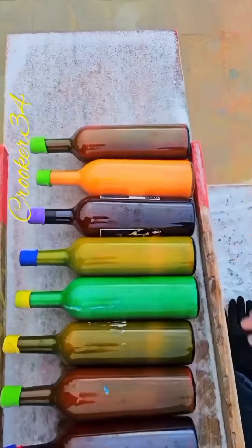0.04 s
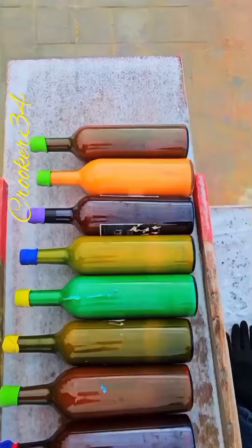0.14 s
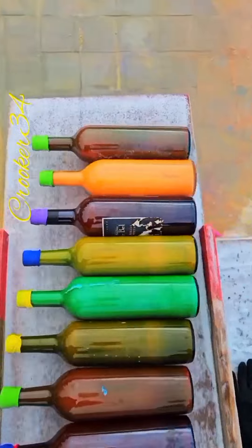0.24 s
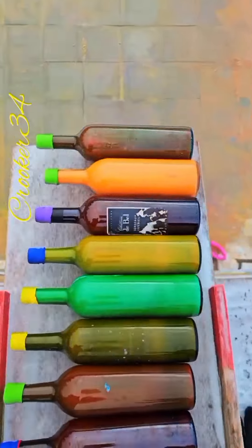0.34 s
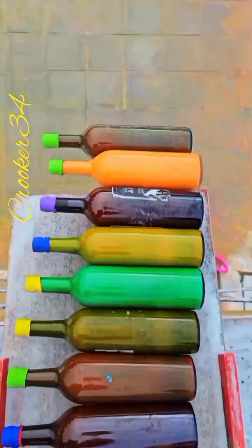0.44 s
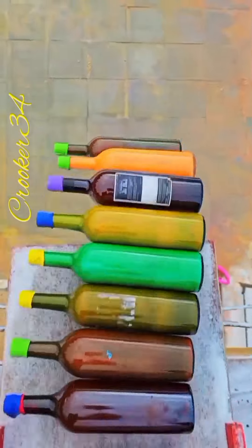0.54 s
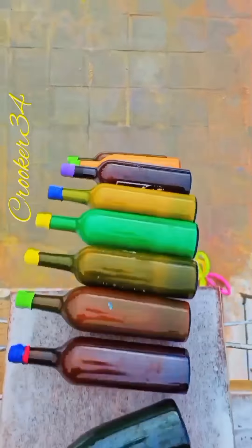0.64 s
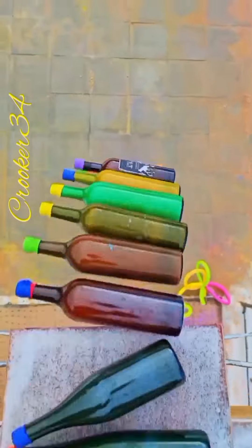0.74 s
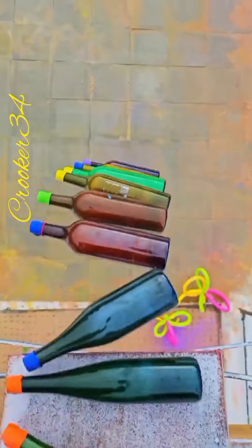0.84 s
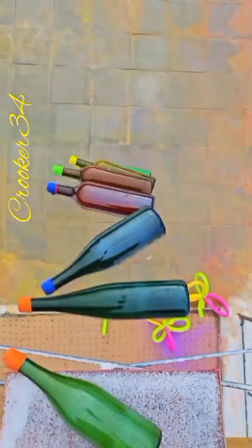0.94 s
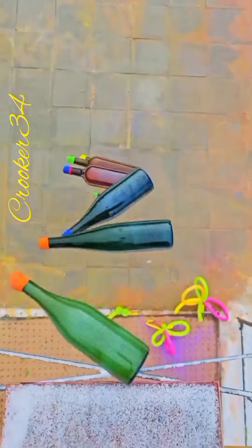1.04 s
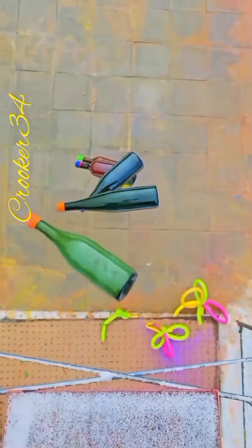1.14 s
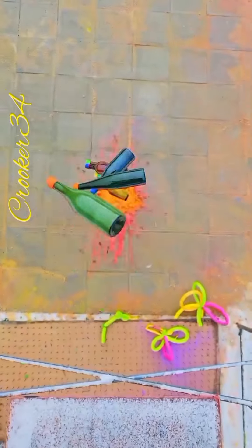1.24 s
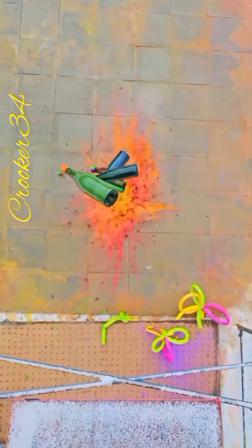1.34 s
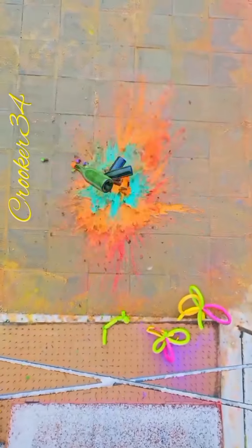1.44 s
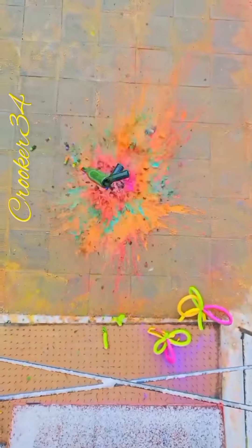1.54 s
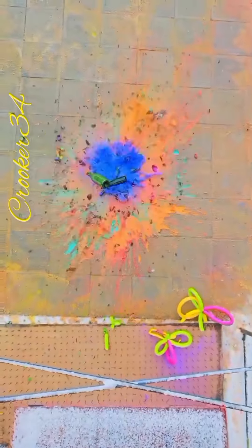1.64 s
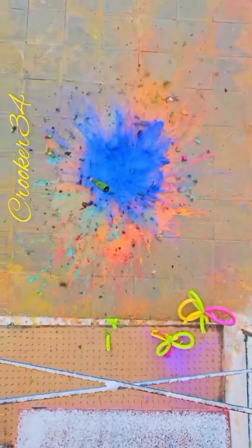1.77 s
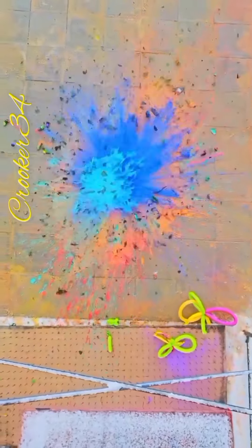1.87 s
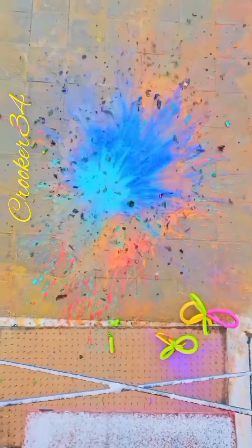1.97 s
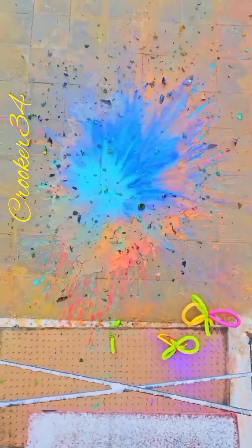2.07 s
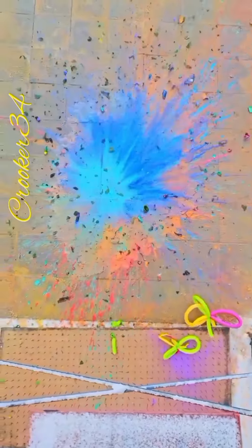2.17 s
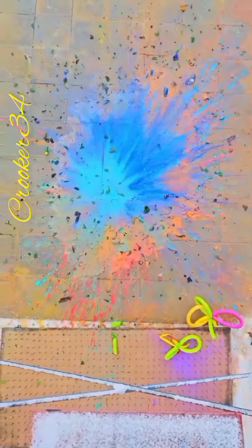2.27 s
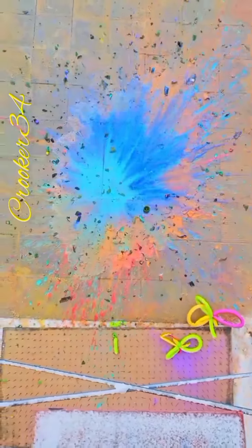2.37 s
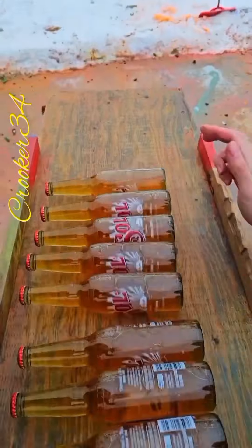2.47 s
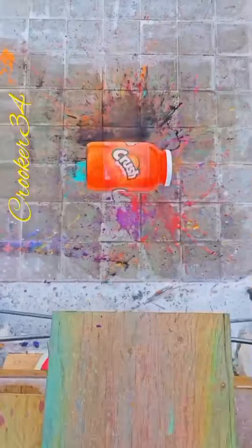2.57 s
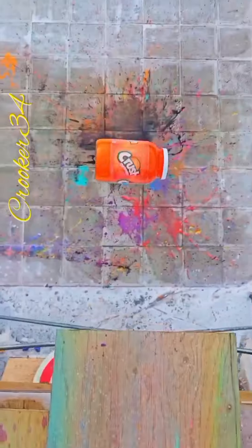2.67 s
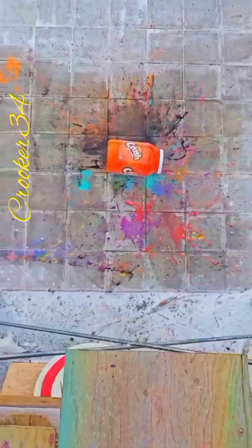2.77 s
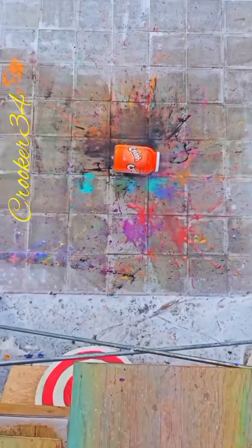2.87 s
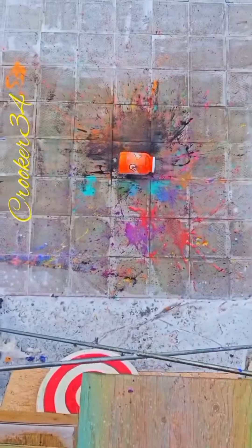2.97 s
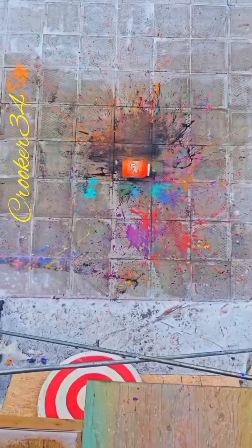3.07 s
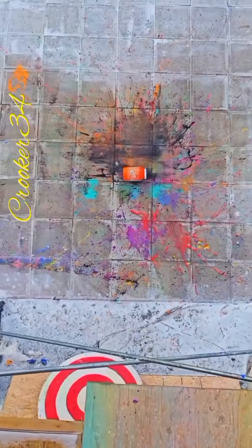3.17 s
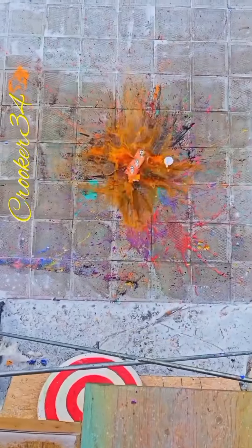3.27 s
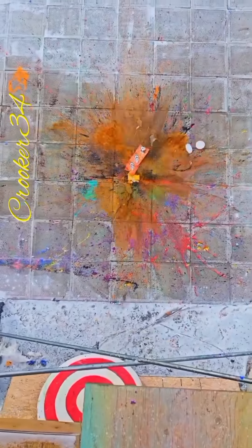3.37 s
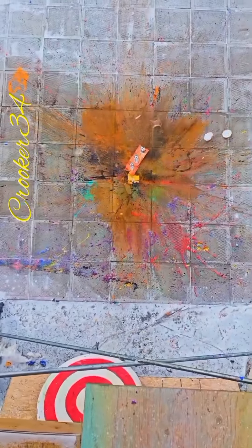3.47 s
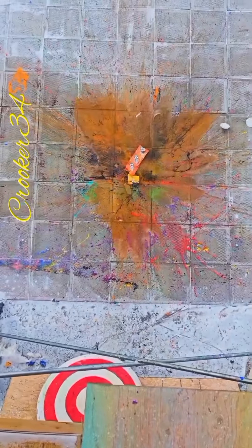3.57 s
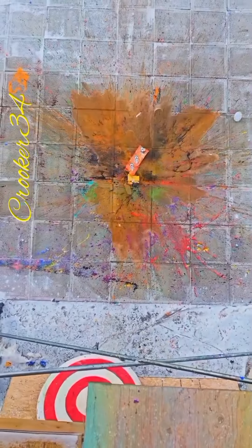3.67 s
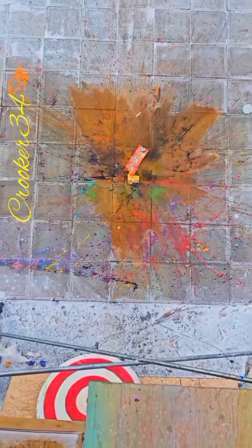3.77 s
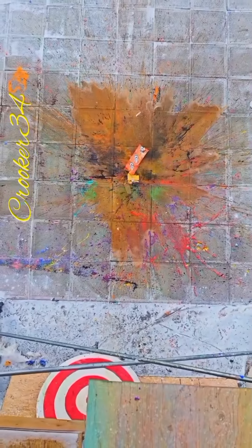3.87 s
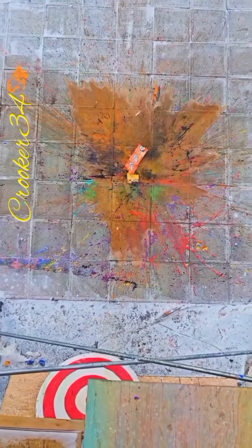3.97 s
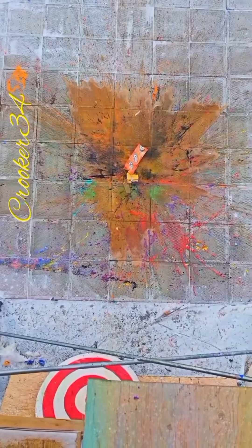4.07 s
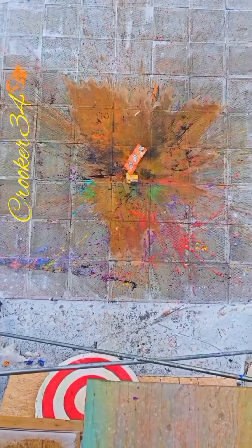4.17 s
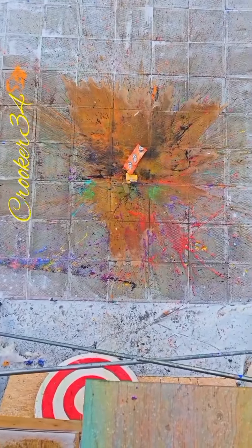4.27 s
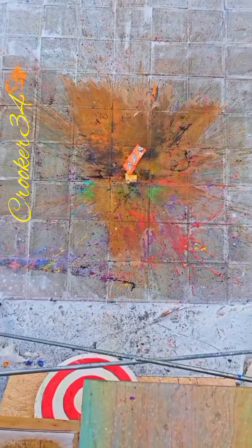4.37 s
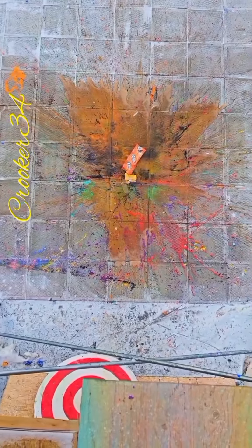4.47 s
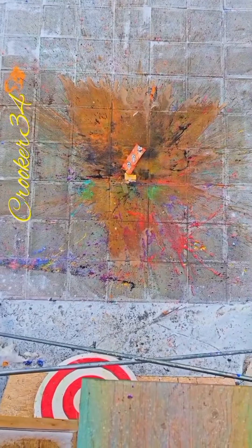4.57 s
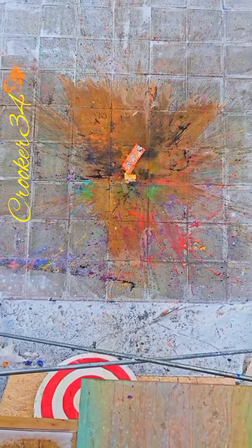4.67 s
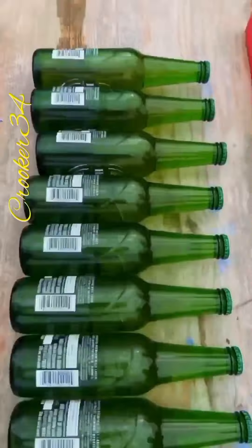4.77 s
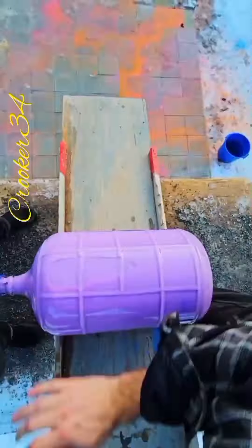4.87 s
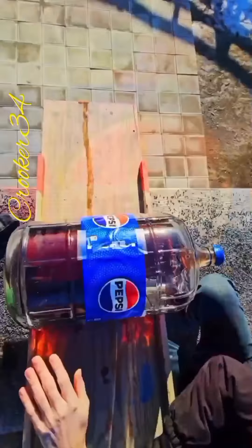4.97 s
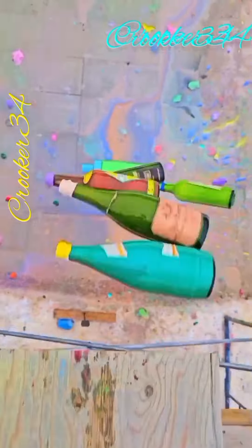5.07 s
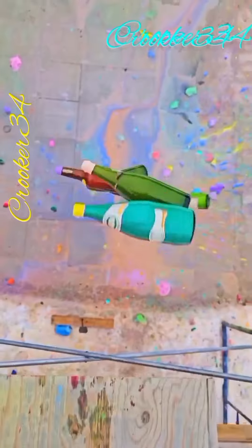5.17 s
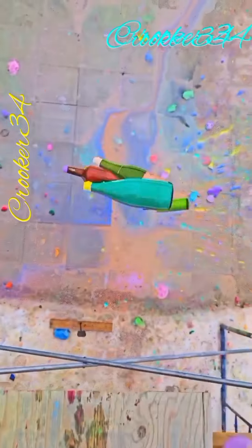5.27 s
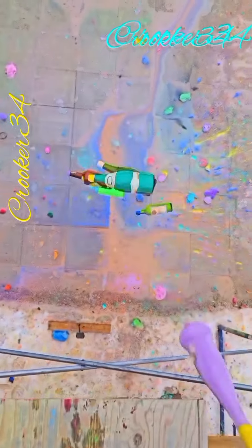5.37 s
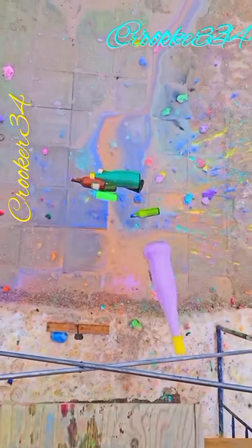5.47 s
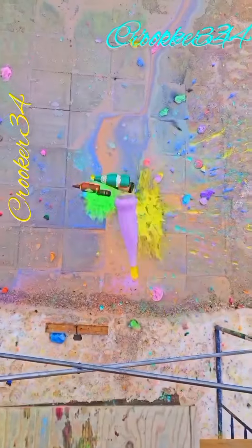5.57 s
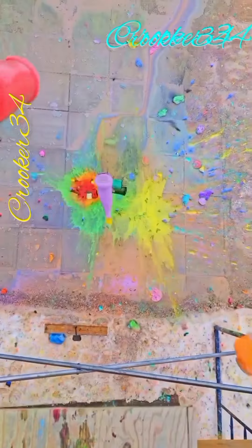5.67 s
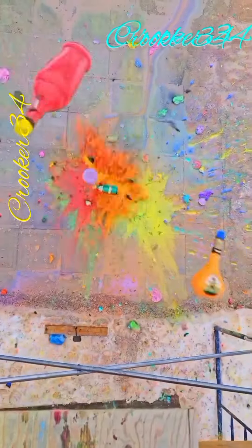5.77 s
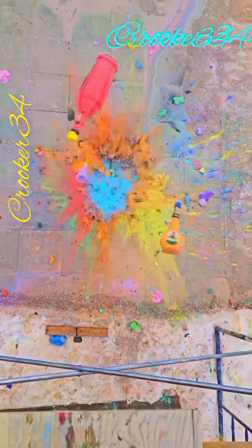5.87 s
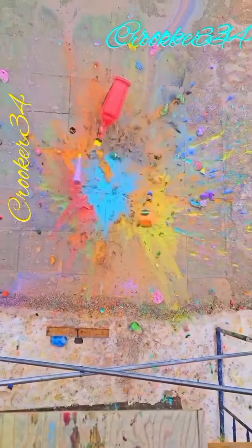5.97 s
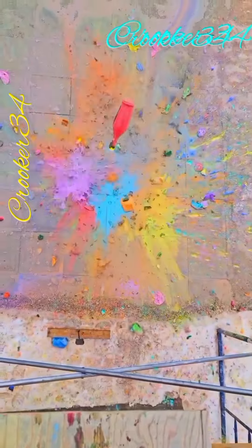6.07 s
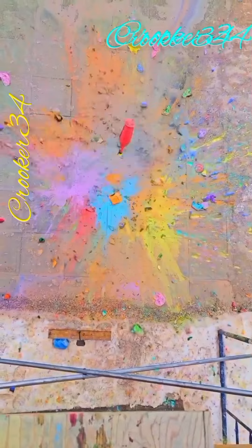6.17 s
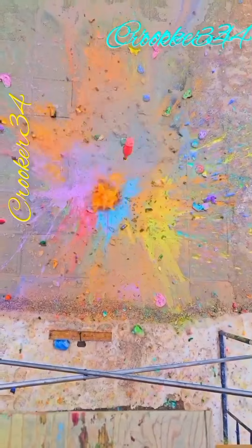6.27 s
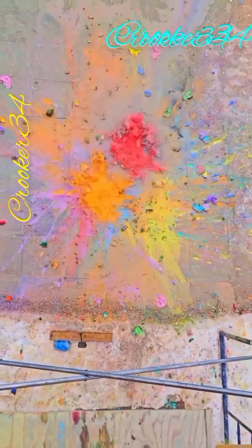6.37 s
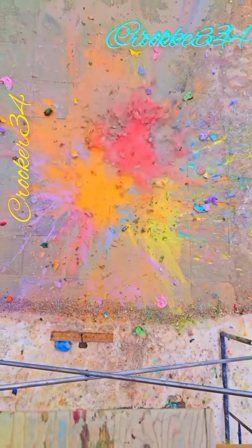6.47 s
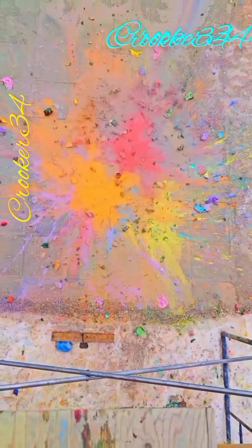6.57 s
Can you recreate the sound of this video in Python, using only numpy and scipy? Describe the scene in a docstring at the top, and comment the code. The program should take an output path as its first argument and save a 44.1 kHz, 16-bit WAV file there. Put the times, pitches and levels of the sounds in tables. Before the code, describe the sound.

A light breeze and distant town surround a close wooden plank. From 0 to 0.3 s bottles rumble heavily, hollow at first then deeper, with glassy chatter; the rumble drops and thins until 1.1 s, with clinks at 0.4-0.6 and dull knocks. From 1.18 to 1.82 about a dozen bottles smash rapidly on stone below: falling pops, dense bright splinters, short ringing walls. Shards skitter and tinkle until 2.4, then stop abruptly. A snatch of rolling comes at 2.43-2.52; the breeze drops and a faint steady hum runs until 4.63. At 3.21 a splashy double break is followed by smaller cracks to 3.6, wet slaps, tinkles and a heavy base bouncing, fading by 4.2. A brief clinking roll at 4.64-4.73 gives way to very faint rolling and knocks near 4.95. From 5.48 to 6.27 a third splashy chain of smashes bursts, shards scattering to the end, with short yard reverberation.

```python
"""Rows of filled glass bottles rumble down a wooden plank, drop and smash on a paved yard in three crashes.
Bumps coloured by the plank make the rumble; tiny contacts and short rings make the rolling glass chatter.
Each break is a falling pop, a crackle of splinters and splash, and ringing walls; shards skitter and tinkle
away, and in the second crash a heavy bottle base bounces. Two later rolls are short snatches, the last is faint.
Shaped noise gives a breeze, which drops, and a distant town; a machine hums for a while as a steady tone."""
import sys
import numpy as np
from scipy import signal
from scipy.fft import rfft, irfft, next_fast_len
from scipy.io import wavfile
from scipy.ndimage import map_coordinates

SR = 44100
rng = np.random.default_rng(int(sys.argv[2]) if len(sys.argv) > 2 else 0)


def bounce(signal):
    """Save signal as a 16-bit WAV file at the path given by the first command-line argument."""
    frames = np.transpose(np.atleast_2d(signal))
    limited = np.clip(frames, -1, 1)
    pcm = np.round(limited * 32767).astype(np.int16)
    wavfile.write(sys.argv[1], SR, pcm)


N = 291494  # samples in the scene
EAR_LAG = 0.00019  # s, sound crossing from one microphone to the other
TOP_HZ = 15550  # upper band limit

# bottles and large pieces breaking on the paving; one bottle may take two rows.
# The functions add their own trims to the pop, large-piece and splash levels:
# [start_s, cracking_s before the glass gives way, pop_db, pop_hz, splinters_db, large_pieces_db,
#  splash_db, burst_t60_s, thrown_shards_db]
BREAKS = [(1.179, 0.00093, -16, 3500, -19, -20.5, -77, 0.06, -35),
          (1.229, 0.0043, -31, 2530, -11.5, -20, -69, 0.059, -30),
          (1.287, 0.0066, -3.5, 1860, -16.5, -17, -68, 0.026, -43),
          (1.338, .001, -10, 3000, -16, -22, -36, 0.17, -39),
          (1.391, 0.006, -10, 3700, -18.5, -17.5, -50, 0.053, -29),
          (1.440, 0.0012, -16, 1540, -18.5, -17.5, -28, 0.13, -26.5),
          (1.488, 0.0018, -31, 1990, -18, -22, -63, 0.18, -43),
          (1.508, .002, -12.5, 1440, -24, -27.5, -49, 0.61, -44),
          (1.619, 0.0037, -34, 1420, -18.5, -20.5, -61, 0.092, -27.5),
          (1.677, 0.0019, -25, 1520, -18, -24, -67, 0.17, -30),
          (1.764, 0.01, -7.5, 1500, -29, -20.5, -41, 0.074, -28.5),
          (1.812, 0.0013, -7.5, 2800, -15, -24, -37, .038, -46),
          (1.823, 0.0038, -14, 1670, -17.5, -23, -58, 0.17, -32.5),
          (3.212, .002, -10, 2230, -17.5, -25.5, -28.5, 0.41, -25.5),
          (3.220, 0.00081, -15, 1270, -22.5, -26.5, -18.5, 0.069, -40.5),
          (3.447, 0.00087, -17.5, 1970, -19.5, -28, -64, 0.057, -29),
          (3.508, 0.00083, -33, 1800, -18.5, -27, -64, .08, -45.5),
          (3.593, 0.00071, -10, 1900, -30, -28.5, -71, 0.072, -36.5),
          (5.480, 0.0012, -8.5, 3190, -18, -18.5, -21.5, 0.035, -25.5),
          (5.520, 0.00098, -11, 1240, -18, -29, -26, 0.16, -26.5),
          (5.562, 0.00096, -8.5, 966, -22, -21.5, -39, 0.14, -27.5),
          (5.624, 0.0036, -17, 1600, -11.5, -22.5, -25.5, 0.085, -29),
          (5.656, 0.039, -10, 1180, -21, -27, -27, 0.11, -42),
          (5.742, .012, -15, 1480, -14, -21, -30, 0.084, -30.5),
          (5.978, 0.00078, -8, 1440, -21.5, -27, -35, 0.16, -29.5),
          (6.1, 0.0006, -19, 2000, -18, -25.5, -57, 0.056, -30.5),
          (6.204, 0.00206, -12, 490, -17.5, -16, -18, 0.047, -27.5),
          (6.252, 0.0029, -19.5, 566, -15.5, -29, -23, 0.11, -37),
          (6.273, .001, -21, 643, -20.5, -26, -36, 0.36, -40)]
# single pieces landing: [start_s, ring_db before the trim in tinkles, ring_hz, chips_db]
TINKLES = [(1.885, -22.5, 4890, -38), (1.979, -23, 11230, -38), (2.028, -37, 4000, -53),
           (2.114, -22.5, 11500, -41), (2.197, -19, 5210, -29), (2.198, -24.5, 3570, -39),
           (2.249, -29.5, 4250, -33), (2.325, -41, 3700, -29), (3.271, -20.5, 2298, -18),
           (3.328, -19, 3830, -23), (3.339, -26.5, 1082, -45), (3.395, -29, 2420, -45.5),
           (3.449, -17, 5100, -37), (3.452, -31, 1080, -36), (3.510, -18.5, 4770, -42),
           (3.535, -24, 4040, -34), (3.547, -15.5, 11800, -18), (3.594, -18.5, 5180, -52),
           (3.598, -23, 4300, -46), (3.641, -21, 7740, -40.5), (3.66, -27, 4900, -24),
           (3.723, -27, 4440, -37.5), (3.781, -35, 4820, -26), (3.837, -31, 3740, -27.5),
           (3.927, -25.5, 4900, -35), (4, -45, 7190, -39.5), (4.197, -66, 4370, -50.5),
           (4.264, -60, 4490, -49.5), (4.348, -57, 3780, -50), (5.664, -10.5, 4030, -32),
           (5.897, -32, 4130, -40), (6.14, -19, 7730, -45), (6.304, -21, 5000, -37)]
# spectrum of large glass pieces, relative: [freq_hz, level_db per Hz]
LARGE_SPECTRUM = [(150, -19), (500, -5.5), (1000, 0), (1600, 5.5), (2800, 3.5), (3600, 4.5), (5000, -31),
                  (9000, -59)]
# spectrum of fine splinters, relative: [freq_hz, level_db per Hz]
FINE_SPECTRUM = [(1500, -54), (2800, -16.5), (4000, 5.5), (6000, 1), (9000, 1.5), (12000, -0.5),
                 (15000, 0.5)]
# broad hiss, in the air and in the faint last roll, relative: [freq_hz, level_db per Hz]
HISS_SPECTRUM = [(300, -6), (2000, -5), (6000, -9.5), (15000, -15.5)]


def amp(db):
    """Decibels to gain."""
    return 10 ** (np.asarray(db) / 20)


def unit(x):
    """Scaled to rms 1."""
    return x / np.sqrt(np.mean(x ** 2) + 1e-20)


def along(points, hz):
    """(Hz, value) points read on a log frequency axis."""
    f, v = np.transpose(points)
    return np.interp(np.log(hz + 1), np.log(f), v)


def clock(seconds):
    """Sample times from zero."""
    return np.arange(int(seconds * SR)) / SR


def add(out, s, x):
    """Mix x into out from time s."""
    i = max(0, round(s * SR))
    out[:, i:i + x.shape[-1]] += x[..., :N - i]


def gate(start, end, release_t60=0.012):
    """On from start to end, with a 2 ms fade-in, then dying away."""
    t = np.arange(N) / SR
    fade_in = np.clip((t - start) / .002, 0, 1)
    return fade_in * amp(-60 * np.maximum(t - end, 0) / release_t60)


def swell(rise, t60, seconds=1.0):
    """A straight rise, then an even decay in dB."""
    t = clock(seconds)
    return np.minimum(t / max(rise, 1e-4), 1) * amp(-60 * np.maximum(t - rise, 0) / t60)


def colour(x, spectrum):
    """x shaped by (Hz, dB) points, at rms 1."""
    n = x.shape[-1]
    m = next_fast_len(n + 4096)
    gain = amp(along(spectrum, np.fft.rfftfreq(m, 1 / SR)))
    return unit(irfft(rfft(x, m) * gain, m)[..., :n])


def diffuse(pair, bass_alike=0.86):
    """Sound from all sides at two close microphones: alike in the bass, unrelated in the treble."""
    n = pair.shape[-1]
    m = next_fast_len(n)
    likeness = min(bass_alike, 1) * np.sinc(2 * EAR_LAG * np.fft.rfftfreq(m, 1 / SR))
    turn = np.arccos(likeness) / 2
    mid, side = irfft(rfft(pair, m) * [np.cos(turn), np.sin(turn)], m)[:, :n]
    return np.array([mid + side, mid - side])


def ticks(n, rate, spread_db):
    """A diffuse stream of tiny random contacts of uneven size, rate per second."""
    size = amp(spread_db * np.minimum(rng.standard_normal((2, n)), 2)) * rng.choice([-1, 1], (2, n))
    return diffuse(size * (rng.random((2, n)) < rate / SR))


def glass_t60(hz):
    """Glass lying on something rings briefly, and the higher the shorter."""
    return .15 * (4000 / hz) ** .4


def ring(modes, tick_db, rattle=0.56, split=0.0031, twin_db=-7):
    """Struck glass: a tick, then (Hz, dB, t60) modes beating with close twins, jolted again as the piece rattles."""
    t = clock(.3)
    ears = np.array([[1], [-1]])
    out = amp(tick_db - 60 * t / 0.0015) * rng.standard_normal((2, len(t)))
    for hz, db, t60 in modes:
        lag = rng.uniform(-0.62, 0.59) * EAR_LAG * ears
        phase = 2 * np.pi * hz * (t + lag)
        twin = np.sin(phase * (1 + split * rng.normal()) + rng.uniform(0, 2 * np.pi))
        pair = np.sin(phase) + amp(twin_db) * twin
        fade = amp(db + rng.normal(0, 1.5, (2, 1)) - 60 * t / t60)
        out += (hz < TOP_HZ) * fade * pair  # modes above the band limit are left out
    after = rng.uniform(.003, .06, 5)  # s, five later jolts
    jolts = rattle * np.exp(-after / 0.051) * rng.choice([-1, 1], len(after))
    contacts = np.bincount((after * SR).astype(int), jolts)
    contacts[0] = 1
    rattled = signal.fftconvolve(out, contacts[None], axes=1)
    return rattled * np.linalg.norm(out) / np.linalg.norm(rattled)  # the jolts share the energy of the blow


def shards(rate, pitch_hz, t60, spread_db):
    """Many small pieces, each ringing briefly at its own pitch from its own direction."""
    t = clock(.5 * t60)
    traits = np.clip(rng.standard_normal((int(rate * N / SR), 4)), -2, 2)
    pitch, size, life, pan = traits.T[:, :, None]
    start, side = rng.random((len(pitch), 2)).T[:, :, None]
    hz = np.minimum(pitch_hz * 2 ** (.75 * pitch), SR / 2.2)
    fade = amp(spread_db * size - 60 * t / (t60 * 2 ** (life / 2)))
    fade = fade * (1 - (t / t[-1]) ** 2)  # reaches silence at the end of each ring
    where = ((start * N).astype(int) + np.arange(len(t))).ravel()

    def ear(k):
        tone = np.sin(2 * np.pi * hz * (t + k * (side - .5) * EAR_LAG))
        return np.bincount(where, (amp(2 * k * pan) * fade * tone).ravel())[:N]

    return unit(np.array([ear(1), ear(-1)]))


def rolling(chatter_power=1.39, ringing=0.49):
    """Seams and grit bump the plank and the bottles chatter; both fade as bottles run off the end ever faster."""
    # stretches of rolling: [start_s, end_s, rumble_db, chatter_db before the shove, share gone by the end 0-1]
    rolls = [(0, 0.322, -10.5, -31.5, 0.2), (0.32, 1.101, -28, -30.5, .97),
             (2.43, 2.517, -15.5, -25.5, 0.18), (4.643, 4.734, -14, -31, 0.03),
             (4.736, 5.487, -49.5, -64, 0.38)]
    # the plank's voice, one relative spectrum per stretch: [freq_hz, level_db per Hz]
    planks = [
        [(18, -46.5), (30, -2), (85, -8.5), (120, 1.5), (179, -8), (220, 5.5), (369, -9.5), (399, -1),
         (433, -12), (492, -2.5), (607, -15), (785, -9), (1140, -29.5), (1400, -22.5), (1820, -60),
         (3080, -120)],
        [(24, -37), (40, -17), (113, 6), (231, 4), (351, -7), (466, -1.5), (665, -8.5), (844, -21), (1100, -22),
         (1400, -33), (1820, -75), (3080, -120)],
        [(35, -46), (60, -16.5), (100, -11.5), (247, 1.5), (365, -5.5), (457, 0.5), (559, -5.5), (718, -28.5),
         (814, -16.5), (899, -32.5), (1200, -30.5), (1560, -58), (2640, -120)],
        [(35, -44), (60, -35), (124, -2.5), (197, -8.5), (302, 1.5), (499, -8), (566, -18), (641, -17),
         (877, -25), (958, -45), (1200, -28), (1560, -54), (2640, -120)],
        [(30, -20), (100, 2.5), (220, 1), (400, -13), (1300, -29.5), (3000, -32.5)],
    ]
    # hollow, bass-light voice that opens the first rumble: [freq_hz, gain_db]
    hollow = [(150, -23), (400, -3.5), (550, 0), (800, 3), (1100, 3.5), (2000, -5)]
    # rolling wine bottles, relative: [freq_hz, level_db per Hz]
    wine_glass = [(530, -23), (900, -10.5), (1130, -20), (1410, -16), (1850, -18.5), (3380, -15),
                  (4920, -18), (14500, -26), (15400, -41), (16000, -57)]
    # rolling soda bottles, relative: [freq_hz, level_db per Hz]
    soda_glass = [(900, -17), (1400, -8), (1900, -22), (2270, 2.5), (2520, -12), (2740, -4.5), (3200, -24),
                  (3520, -10.5), (4200, -20.5), (8000, -19.5), (15000, -28)]
    # rolling beer bottles, relative: [freq_hz, level_db per Hz]
    beer_glass = [(530, -30.5), (900, -5), (2250, -11), (2830, -20), (4800, -22), (6890, -12), (14700, -37),
                  (16000, -32)]
    deepen_s, hollow_db = .13, -3.5  # the first rumble starts hollow and deepens
    shove_db, shove_t60 = 5.5, 0.64  # an opening shove jostles the glass; t60 in s

    glasses = [wine_glass, wine_glass, soda_glass, beer_glass, HISS_SPECTRUM]
    t, out = np.arange(N) / SR, np.zeros((2, N))
    bumps = ticks(N, rate=900, spread_db=2)
    rings = shards(rate=1100, pitch_hz=2400, t60=.025, spread_db=3)
    grit = unit(ticks(N, rate=2000, spread_db=3)) + ringing * rings
    deep = np.clip(t / deepen_s, .2, 1)
    shove = 1 + amp(shove_db - 60 * t / shove_t60)
    lowpass = signal.butter(2, 350, fs=SR, output="sos")
    for (start, end, rumble_db, chatter_db, gone), plank, glass in zip(rolls, planks, glasses):
        left = 1 - min(gone, 1) * np.clip((t - start) / (end - start), 0, 1) ** 2
        wood = colour(bumps, plank)
        bass = signal.sosfilt(lowpass, wood)
        if start < deepen_s:
            hollow_wood = colour(wood - bass, hollow)
            wood = wood * deep + amp(hollow_db) * np.sqrt(1 - deep ** 2) * hollow_wood
        rumble = amp(rumble_db) * left * wood
        chatter = amp(chatter_db) * shove * left ** chatter_power * colour(grit, glass)
        out += gate(start, end) * (rumble + chatter + clinks(start, end))
    return out


def air(gust_db=3, hum_hz=359, hum_db=-66):
    """A breeze buffets the microphones and carries a distant town, then drops; for a while a machine hums."""
    # distant town, relative: [freq_hz, level_db per Hz]
    town_spectrum = [(30, -19.5), (70, -1), (110, -3.5), (220, -8), (330, -12.5), (700, -22.5), (1300, -37),
                     (3000, -55.5)]
    # wind on the microphones, relative: [freq_hz, level_db per Hz]
    wind_spectrum = [(20, -3.5), (45, -4.5), (80, -2), (115, -4.5), (180, -25), (400, -29.5), (1500, -66)]
    lull_s, lull_takes_s = 2.515, 0.34  # when the breeze drops, and over how long
    wind_db, town_db, hiss_db = (-39.5, -70), (-43, -57.5), (-63.5, -73)  # (in the breeze, in the calm)

    t = np.arange(N) / SR
    calm = np.clip((t - lull_s) / lull_takes_s, 0, 1)
    wind, town, hiss = (amp(np.interp(calm, [0, 1], levels)) for levels in (wind_db, town_db, hiss_db))

    def noise(spectrum):
        return colour(diffuse(rng.standard_normal((2, N)), bass_alike=0.89), spectrum)

    # smooth random swells, one point every 3000 samples
    drift = map_coordinates(rng.standard_normal(N // 3000 + 4), [np.arange(N) / 3000])
    gusts = unit(amp(gust_db * drift))
    running = gate(2.52, 4.63)
    hum = amp(hum_db) * running * np.sqrt(2) * np.sin(2 * np.pi * hum_hz * t)
    return wind * gusts * noise(wind_spectrum) + town * noise(town_spectrum) + hiss * noise(HISS_SPECTRUM) + hum


def clinks(start, end, level_db=2, grind_t60=.07, tick_db=-14):
    """Full bottles knock and briefly grind against each other during one roll; their filling damps the ring."""
    # bottles knocking together: [start_s, ring_db before level_db, grinding_db, one_bottle_hz, other_bottle_hz]
    knocking = [(0.409, -28.5, -30, 2174, 3400), (0.501, -22, -16.5, 3000, 4960),
                (0.527, -24, -19.5, 1710, 3920), (0.62, -13.5, -31, 2196, 2960),
                (4.645, -31, -30, 2250, 2820), (4.685, -21.5, -35.5, 1866, 2870),
                (4.694, -15.5, -32.5, 1950, 2868), (4.711, -28, -30.5, 1935, 2740)]
    # partials of one bottle: [frequency_ratio, level_db]
    bottle = [(1, 0.5), (1.829, -4.5), (2.45, -28), (3.399, -11)]
    # grinding glass, relative: [freq_hz, level_db per Hz]
    grind_spectrum = [(500, -18.5), (1000, 6.5), (2000, 0), (5000, -3.5), (9000, -10), (15000, -14.5)]
    filled_damping = 0.31  # ring time of a full bottle over that of loose glass

    out, contact = np.zeros((2, N)), swell(.001, grind_t60)
    for s, db, grind_db, hz, other_hz in knocking:
        if start < s < end:
            partials = [(hz * ratio, level) for ratio, level in bottle] + [(other_hz, 1)]
            modes = [(f, level, filled_damping * glass_t60(f)) for f, level in partials]
            add(out, s, amp(db + level_db) * ring(modes, tick_db))
            grinding = colour(ticks(len(contact), rate=5400, spread_db=2.5), grind_spectrum)
            add(out, s, amp(grind_db) * contact * grinding)
    return out


def knocks(level_db=1, t60=0.11):
    """Dull thuds of the plank: wood-coloured contacts under sharp, dying blows."""
    # dull wooden knocks during and after the rolling: [start_s, level_db before level_db is added]
    thuds = [(0.557, -31), (.742, -23), (2.79, -39.5), (4.917, -33), (4.95, -24.5)]
    wood = [(50, 3), (130, -5.0), (225, -2), (350, -14.5), (600, -22.5), (2000, -38), (12000, -49)]  # (Hz, dB per Hz)
    blows, t = np.zeros((1, N)), clock(.5)
    for s, db in thuds:
        add(blows, s, amp(db + level_db - 60 * t / t60) * (1 - np.exp(-t / 0.00022)))
    return blows * colour(ticks(N, rate=9000, spread_db=3), wood)


def bursts(splash_life=0.98):
    """Cracks race through the glass in a dense crackle; landing pieces chip; filling splashes and slaps back."""
    # thrown filling slapping back onto the stone: [start_s, level_db]
    splats = [(3.552, -44), (3.625, -36.5), (3.829, -38), (3.866, -37.5), (6.03, -38)]
    # splashing filling, relative: [freq_hz, level_db per Hz]
    splash_spectrum = [(40, -28), (110, -5), (250, 6), (500, 1), (800, -3.5), (1600, -19.5), (5000, -53)]
    chip_rise_s, chip_t60, chip_large_db = 0.0011, 0.12, -15  # a chipping piece's crackle, and its coarse part
    splat_rise_s, splat_t60 = .004, 0.16  # each slap swells and drains away

    swells = np.zeros((3, N))  # splinters, large pieces, splash
    for s, cracking, _, _, fine_db, large_db, splash_db, t60, _ in BREAKS:
        burst = swell(cracking, t60)
        splash = amp(splash_db) * swell(cracking, splash_life * t60)
        add(swells, s, np.array([amp(fine_db) * burst, amp(large_db) * burst, splash]))
    for s, _, _, chips_db in TINKLES:
        add(swells[:2], s, amp([[chips_db], [chips_db + chip_large_db]]) * swell(chip_rise_s, chip_t60))
    for s, db in splats:
        add(swells[2:], s, amp(db) * swell(splat_rise_s, splat_t60))
    crackle = ticks(N, rate=13000, spread_db=2.5)
    spectra = [FINE_SPECTRUM, LARGE_SPECTRUM, splash_spectrum]
    return sum(level * colour(crackle, spectrum) for level, spectrum in zip(swells, spectra))


def scatter():
    """Every break throws shards that skitter, ringing and scraping as they die down; a crash's throws pile up."""
    # shards of each crash: [start_s, end_s, stop_t60_s, large_over_fine_db, ringing_against_scraping ratio]
    crashes = [(1.17, 2.409, 0.017, -8, 0.69), (3.2, 4.141, 0.57, 1.5, 1.3), (5.47, 6.578, 0.013, -4, 0.17)]
    spread_s, large_t60, fine_t60 = 0.0091, 1.42, 2.02  # shards fly out in a moment; the large ones settle first

    slivers = shards(rate=1100, pitch_hz=6500, t60=.05, spread_db=4)
    pieces = shards(rate=220, pitch_hz=6000, t60=.15, spread_db=4)
    ringing = unit(slivers + pieces)
    scraping = unit(ticks(N, rate=7000, spread_db=3))
    # pieces land in clumps: a random level every 700 samples, joined by straight lines in dB
    clumps = amp(1.9 * map_coordinates(rng.standard_normal(N // 700 + 4), [np.arange(N) / 700], order=1))
    throw = np.array([swell(spread_s, t60, seconds=2) for t60 in (large_t60, fine_t60)])
    out = np.zeros((2, N))
    for start, end, stop_t60, large_db, share in crashes:
        power = np.zeros((2, N))  # large pieces, fine pieces
        for s, *_, thrown_db in BREAKS:
            if start < s < end:
                add(power, s, (amp(thrown_db) * throw) ** 2)
        large, fine = np.sqrt(power) * gate(start, end, stop_t60)
        glass = (share * ringing + scraping) * clumps
        out += amp(large_db) * large * colour(glass, LARGE_SPECTRUM) + fine * colour(glass, FINE_SPECTRUM)
    return out


def pops(level_db=8.0, thump_db=-2, decay=3.7, thump_hz=175, edge_s=.00004):
    """The cracked wall gives way in a short pulse of falling pitch; the filling thumps the ground below it."""
    out, t = np.zeros((2, N)), clock(.1)
    turns = thump_hz * t
    thump = np.sin(2 * np.pi * turns) * 2 * turns * np.exp(1 - 2 * turns)
    for s, cracking, db, hz, _, _, splash_db, _, _ in BREAKS:
        lag = rng.uniform(-0.52, 0.89) * EAR_LAG * np.array([[1], [-1]])
        u = np.maximum(t + lag, 0)
        # the pulse slows as the break opens, from 1.5 times hz downwards
        pulse = np.sin(2 * np.pi * 3 * np.log1p(hz * u / 2))
        snap = pulse * amp(-60 * u * hz / (2 * decay)) * (1 - np.exp(-u / edge_s))
        add(out, s + cracking, amp(db + level_db) * snap + amp(splash_db + thump_db) * thump)
    return out


def walls(level_db=-8, pitch_hz=2100, octaves=0.66, count=4):
    """Large curved pieces of glass ring for a moment as they part, each break at its own pitches."""
    out = np.zeros((2, N))
    t60 = .055  # s
    for s, cracking, _, _, _, large_db, _, _, _ in BREAKS:
        pitches = pitch_hz * 2 ** (octaves * np.clip(rng.standard_normal(count), -2, 2))
        add(out, s + cracking, amp(large_db + level_db) * ring([(hz, 0, t60) for hz in pitches], tick_db=-10))
    return out


def tinkles(shard_db=2, base_db=1, upper_db=-13, shard_life=0.62, base_life=0.81, tick_db=-5):
    """Single pieces ring on the stone and a heavy base keeps bouncing; its thick glass is given a longer ring."""
    # a heavy bottle base bouncing: [start_s, level_db before base_db]
    bounces = [(3.396, -48), (3.509, -16.5), (3.596, -21), (3.659, -28.5), (3.784, -30), (3.836, -32.5),
               (3.925, -40), (3.998, -35), (4.059, -37), (4.10, -37.5), (4.187, -54)]
    # ringing modes of that base: [freq_hz, level_db]
    base_modes = [(1884, -10.5), (2325, -6), (2374, -9.5), (2418, 1), (3790, -2), (4450, -10.5),
                  (6153, -26.5), (7187, -6.5), (8387, -3.5)]
    out = np.zeros((2, N))
    for s, db, hz, _ in TINKLES:
        upper = np.array([1.4, 1.75, 2.3]) * rng.uniform(.92, 1.08, 3)  # every shard has its own shape
        modes = [(hz, 0, shard_life * glass_t60(hz))]
        modes += [(f, upper_db, shard_life * glass_t60(f)) for f in hz * upper]
        add(out, s, amp(db + shard_db) * ring(modes, tick_db))
    base = [(hz, db, base_life * glass_t60(hz)) for hz, db in base_modes]
    for s, db in bounces:
        add(out, s, amp(db + base_db) * ring(base, tick_db=0))
    return out


def yard(x):
    """The walls around the paving answer with a diffuse tail that builds over 6 ms and dies away by frequency."""
    # decay of the yard: [freq_hz, t60_s]
    decay = [(150, 0.15), (1000, 0.19), (4000, 0.31), (15000, 0.97)]
    hz, t, z = signal.stft(rng.standard_normal((2, SR // 2)), SR, nperseg=256)
    fading = z * amp(-60 * t / along(decay, hz)[:, None])
    tail = diffuse(signal.istft(fading, SR, nperseg=256)[1])
    tail *= np.minimum(np.arange(tail.shape[1]) / SR / 0.0062, 1)
    return signal.fftconvolve(x, tail / np.linalg.norm(tail[0]), axes=1)[:, :N]


def scene():
    """Breaking glass below, the plank close by, wind all round."""
    glass = pops() + walls() + bursts() + tinkles()
    return glass + amp(-9.5) * yard(glass) + scatter() + rolling() + knocks() + air()


def record(dry):
    """Peaks are rounded off towards full scale, then a low-pass filter cuts the top of the band."""
    held = dry / (1 + np.abs(dry) ** 6) ** (1 / 6)
    lowpass = signal.firwin(201, TOP_HZ, fs=SR, window="blackman")
    return signal.fftconvolve(held, lowpass[None], "same", axes=1)


dry = scene()
out = record(dry)
bounce(out)
```